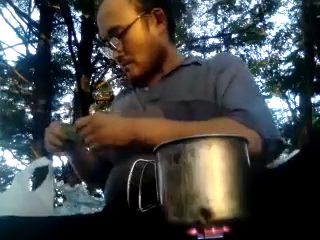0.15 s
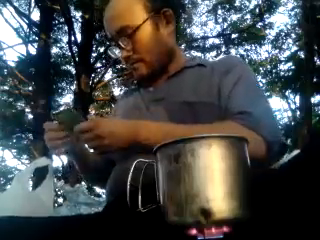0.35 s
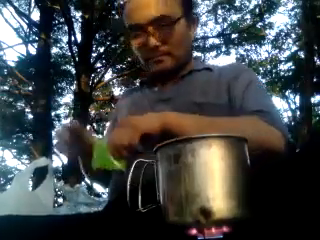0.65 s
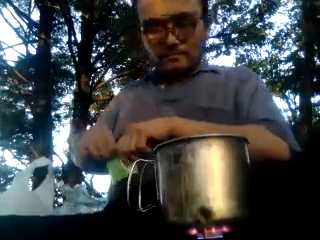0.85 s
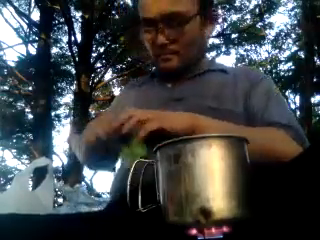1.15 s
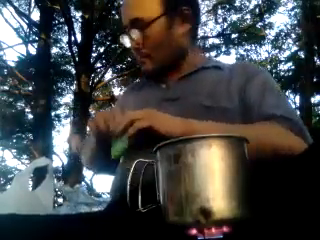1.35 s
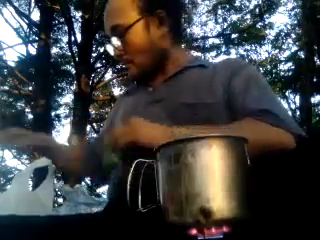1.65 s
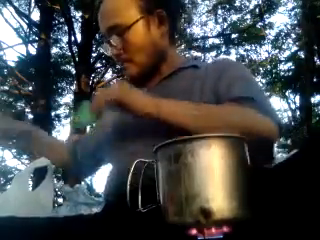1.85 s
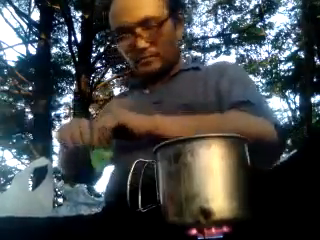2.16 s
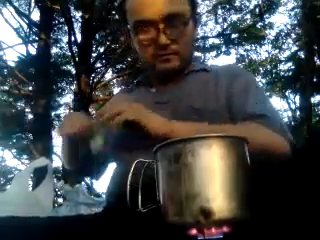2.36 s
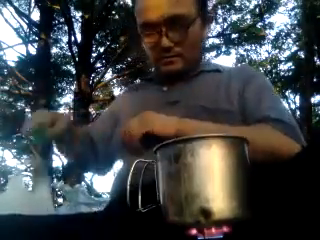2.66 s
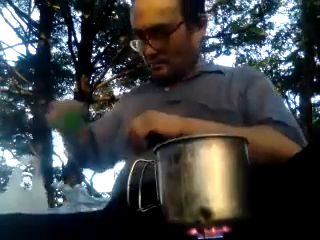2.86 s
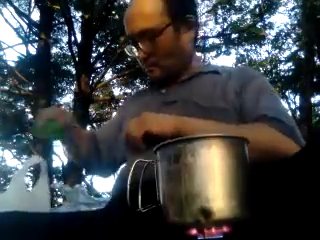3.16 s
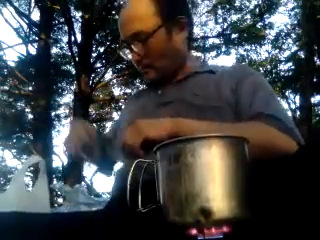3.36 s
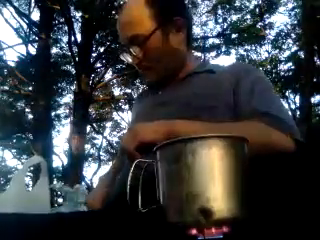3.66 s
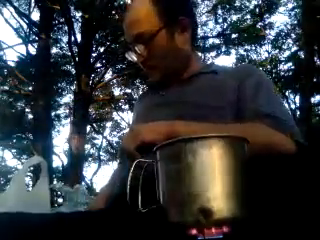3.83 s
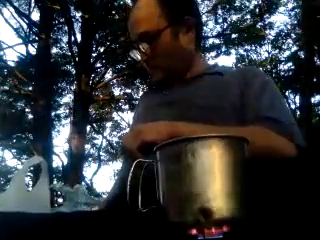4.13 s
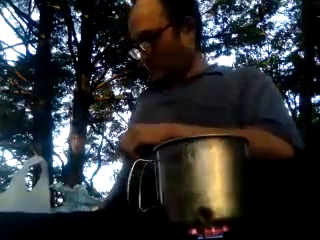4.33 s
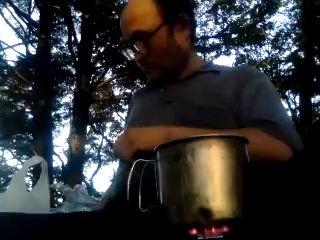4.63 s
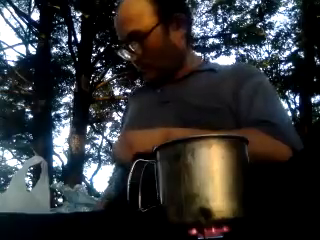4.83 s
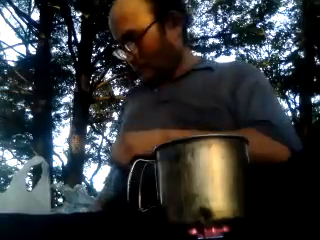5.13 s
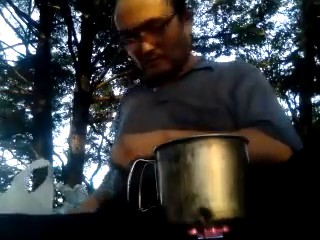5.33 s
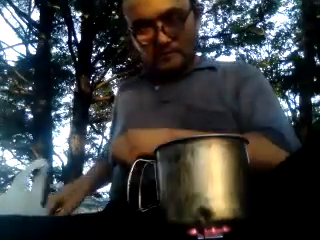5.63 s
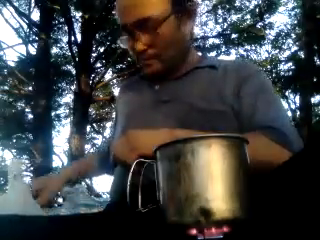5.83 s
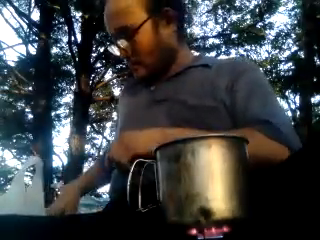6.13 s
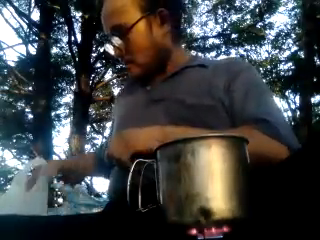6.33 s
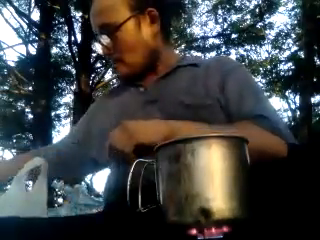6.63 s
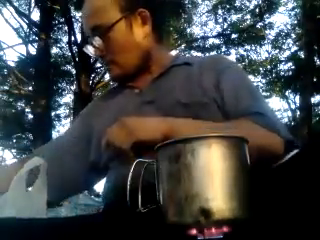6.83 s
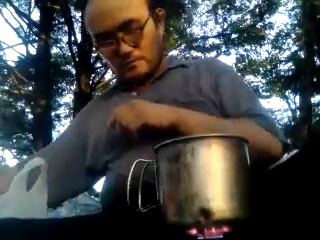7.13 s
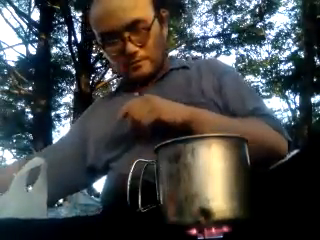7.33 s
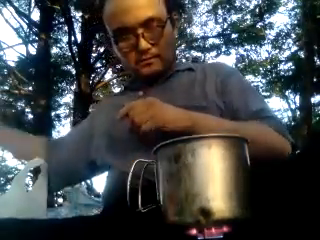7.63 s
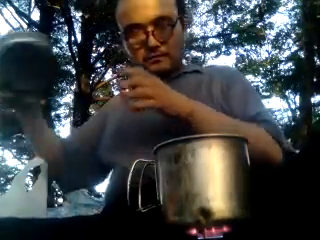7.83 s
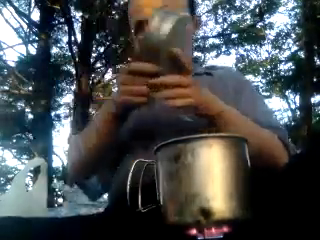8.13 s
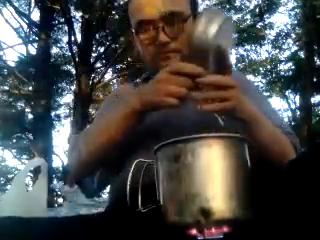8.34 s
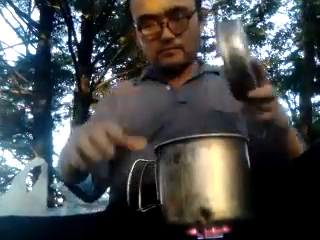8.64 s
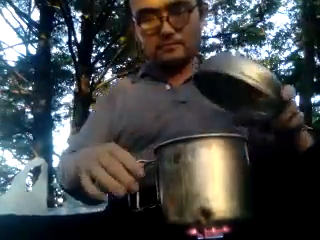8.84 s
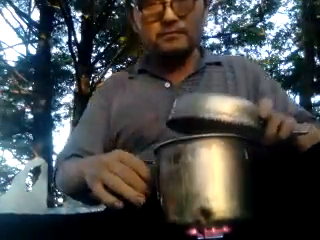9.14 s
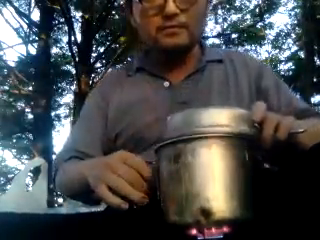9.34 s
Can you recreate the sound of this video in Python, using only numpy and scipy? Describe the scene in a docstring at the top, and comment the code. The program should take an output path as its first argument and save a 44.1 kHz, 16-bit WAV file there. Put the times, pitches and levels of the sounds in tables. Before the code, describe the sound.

Close, steady burner hiss with a fluttering low roar; crisp foil crinkling for under four seconds, later light metallic knocks and scrapes of a lid.

```python
"""A gas camping stove roars and hisses under a metal pot, outdoors: two noises, a fluttering low flame
and a steadier gas jet. A foil packet is fingered, torn and shaken: short noise bursts for the loud creases,
clustered ticks between. Then a thin metal lid is picked up, turned over and set on the pot: decaying modes,
cracks and finger rubs. A close two-port microphone hears it all: the right port faces the scene, the left one
is duller on top and takes the burner's lows in nearly opposite phase."""
import sys
import numpy as np
from scipy import signal
from scipy.fft import rfft, irfft, next_fast_len
from scipy.io import wavfile
from scipy.ndimage import uniform_filter1d, map_coordinates

SR = 44100
rng = np.random.default_rng(int(sys.argv[2]) if len(sys.argv) > 2 else 0)


def field_ratio(decibels):
    """Amplitude ratio for a level in dB (20 dB per decade); scalars and array-likes work."""
    return 10 ** (np.asarray(decibels, dtype=float) / 20)


def dump_mix(stems):
    """Bounce the given channels to the path in sys.argv[1] as a 16-bit WAV at rate SR."""
    frames = np.atleast_2d(stems).T  # one column per channel
    limited = np.clip(frames, -1, 1)  # hard clip at full scale
    pcm = np.round(limited * 32767).astype(np.int16)
    wavfile.write(sys.argv[1], SR, pcm)


N = 418068

# burner tone at the ports, notched by pot and ground: frequency_hz, right_db_per_hz, left_minus_right_db
BURNER_TONE = [(25.1, -81.5, 0), (59.3, -63.5, -1), (120, -61, -0.6), (202, -58.5, -2), (240, -55.5, -3),
               (420, -60, -4), (470, -62, -1.5), (523, -72.5, -5), (670, -64, 2), (720, -69, 1.5),
               (1013, -62.5, -1), (1127, -62, -20), (1255, -66.5, -19.5), (1320, -78, 1.5),
               (1610, -68, -5.5), (1710, -69.5, -7.5), (2076, -76, -13.5), (2346, -89, 1), (2330, -85, -6),
               (2796, -82, 0.5), (3140, -81, -1.5), (3240, -79, -5.5), (3440, -74.5, -18.5),
               (3880, -72.5, -7.5), (3780, -69, -18), (3970, -72, -21), (4150, -89, 6), (4590, -82.5, 9.6),
               (4588, -60.5, -5), (4837, -68.5, -4), (5300, -72, -14), (5070, -68, -11.5),
               (5500, -74.5, -16), (6000, -74.5, -10), (6250, -74, -8.5), (6400, -70.5, -20.5),
               (6770, -73.5, -20.5), (7050.0, -72.5, -10), (7124, -84, -7), (7490, -68.5, -11.5),
               (7690, -74, -23), (8200, -71, -34), (8030, -76, -18), (8635, -79.5, -18), (8420, -84, -35),
               (9120, -87.5, -50), (9940, -91, -45), (9600, -121.3, -25)]
# slow drift of the burner: time_s, roar_db, jet_db
BURNER_DRIFT = [(0, 1, 1), (2, 1.5, 1), (3.5, -0.5, 0.5), (4.5, 2, 0.74), (5.5, 1, 1.5), (7, 2, 1),
                (8.3, 1, 1.4), (8.8, 0.5, 1.5), (9.48, 1.5, 1)]
# how the burner in the left port follows the right: frequency_hz, likeness (0-1), left_lead_rad
PORT_LIKENESS = [(25.0, 0.86, 3.02), (60.0, 0.96, 2.9), (120.0, 0.95, 2.89), (200.0, 0.95, 2.87),
                 (260.0, 0.96, 2.88), (400.0, 0.94, 2.81), (480.0, 0.9, 3.23), (560.0, 0.99, 3.15),
                 (640.0, 0.97, 3.06), (780.0, 0.86, 2.71), (1050.0, 0.79, 1.46), (1180.0, 0.62, 1.73),
                 (1260.0, 0.05, 2.45), (1400.0, 0.29, -0.14), (1550.0, 0.7, 0.84), (1800.0, 0.48, 1.14),
                 (2050.0, 0.21, 4.11), (2300.0, 0.45, 3.26), (2450.0, 0.79, 3.22), (2650.0, 0.65, 2.89),
                 (2900.0, 0.69, 2.69), (3200.0, 0.31, 0.92), (3450.0, 0.49, 1.5), (3650.0, 0.09, 0.71),
                 (3850.0, 0.45, 3.35), (4050.0, 0.22, 4.62), (4190.0, 0.12, 5.76), (4350.0, 0.85, 3.11),
                 (4650.0, 0.79, 2.56), (4900.0, 0.58, 2.66), (5100.0, 0.55, 2.41), (5300.0, 0.55, 2.39),
                 (5550.0, 0.13, 2.12), (5850.0, 0.17, 3.4), (6100.0, 0.42, 2.01), (6450.0, 0.17, 2.47),
                 (6800.0, 0.51, 2.79), (7050.0, 0.47, 2.76), (7150.0, 0.14, 2.22), (7300.0, 0.3, 1.57),
                 (7600.0, 0.46, 2.79)]
# loudest creases of the packet: start_s, level_db (before the foil tone), decay_ms
FOIL_SNAPS = [(0.0184, -5.5, 1.3), (0.0909, -15, 2.3), (.621, -11.5, 1.4), (0.9646, -13.5, 1.5),
              (1.007, -16, 1.8), (1.0568, -15.5, 1.7), (1.1364, -13.5, 1.8), (1.196, -16.5, 2),
              (1.3627, -2, 0.68), (1.4938, -18, 1.9), (1.5972, -13, 1.6), (1.6036, -16.5, 1.7),
              (1.8007, -15, 1.2), (1.8618, -11, 2), (1.951, -15, 1.9), (1.9705, -10.5, 3.6),
              (1.9827, -16, 1.8), (1.9966, -16.5, 2.7), (2.2678, -11.5, 1.8), (2.3162, -17, 0.87),
              (2.3471, -15.5, 2.1), (2.4249, -9, 1.5), (2.5164, -19, 4.2), (2.6185, -11, 1.8),
              (2.6322, -8.5, 1.4), (2.6977, -14, 2.4), (2.7048, -14, 2.1), (2.7138, -12, 1.1),
              (2.7889, -6, 1.4), (2.7981, -7, 4), (2.806, 0.1, 1.7), (2.8636, -9.5, 4.6), (2.8689, -9, 2.1),
              (2.8917, -13.5, 2.5), (2.968, -13.5, 3), (2.9931, -8, 1.4), (3.0688, -21.5, 3.2),
              (3.196, -12, 3.1), (3.2713, -17, 1.9), (3.2817, -8.5, 3.3), (3.2887, -8, 0.47),
              (3.2933, -7, 2.9), (3.3503, -9, 5.8)]
# handfuls of crinkling, one for each squeeze or shake: start_s, length_s, level_db (before the foil tone)
FOIL_HANDFULS = [(0, 0.1, -25.5), (0.267, 0.079, -32.5), (0.584, 0.07, -28), (0.673, 0.043, -32.5),
                 (0.887, .06, -33.5), (1.043, 0.099, -28), (1.33, 0.034, -29), (1.509, 0.1, -34),
                 (1.71, 0.12, -34), (1.93, 0.12, -32), (2.28, 0.091, -23), (2.497, 0.025, -26.5),
                 (2.586, .07, -21.5), (2.69, .035, -15.5), (2.773, 0.049, -17), (2.851, 0.036, -18.5),
                 (2.955, 0.054, -19.5), (3.029, 0.078, -22), (3.169, 0.034, -25.5), (3.252, 0.059, -15.5),
                 (3.339, .08, -24), (3.5, 0.12, -30.5), (3.725, 0.034, -29.5)]
# foil tone: frequency_hz, gain_db
FOIL_TONE = [(350, -54), (600, -17.5), (1250, -6.5), (1560, -6.5), (1700, -7.5), (2850, -4), (3490, -1.5),
             (6820, -1.5), (8070, -1), (9540, -14), (10500, -44), (13600, -65.5), (22000, -120)]
# left port's filter on the packet: frequency_hz, gain_db
FOIL_SHADOW = [(500, 10), (2000, -10), (3300, -6), (4500, -17.5), (6000, -16.5), (8500, -28), (10000, -57)]
# lid contacts: start_s, relative level_db, low_modes_db, high_modes_db,
# decay_speed (1 = the t60 in LID_MODES, below 1 rings longer)
LID_CONTACTS = [(7.058, -19.5, -11, -12.5, 1.6), (7.136, -8.5, -7, -17, 3.3),
                (7.149, -15, -21, -21.5, 0.75), (7.309, -31.5, 5.5, -7, 0.82), (7.4, -16.5, -3.5, 2, 4.7),
                (7.423, -25.5, -4, -5, 1.1), (7.534, -22, -4.5, -21.5, 1.3), (7.565, -35.5, -21, 3, 0.59),
                (7.785, -35, -34.5, 4.5, 0.65), (7.85, -23.5, -22, -12.5, 0.25),
                (7.967, -8, -26, -18, 0.75), (8.105, -24, -20.5, -10, 0.83), (8.235, -21.5, -26, 0, 1.45),
                (8.383, -27.5, -28, 0.5, 2.2), (8.4, -38.5, -25, 3, 0.56), (8.462, -27, -33.5, -3, 1.4),
                (8.552, -13.5, -25, 1, 4.4), (9.088, -26, -22.5, -4, 1), (9.399, -22.5, 4, -8, 1.2),
                (9.409, -17, 4, -13, 1.3)]
# lid modes: pitch_hz, relative level_db, t60_s (at decay speed 1)
LID_MODES = [(659, 3, .1), (1271, -7.5, 0.12), (1610, -7, 0.027), (2000, -16, 0.11), (1976, -19, 0.057),
             (3160, -18.5, 0.021), (3684, -11.5, 0.13), (4160, -5, 0.076), (4750, -8.5, 0.11),
             (5310, -6, 0.054), (5730, 2, 0.038), (6200, -11, 0.06), (6360, -16.5, 0.13), (7000, -2, 0.064),
             (8020, 0, 0.055)]
# fingers sliding on the lid: start_s, length_s, level_db (before the lid filter)
LID_RUBS = [(7.1, 0.082, -36), (7.392, .05, -28.5), (7.52, 0.045, -36), (7.76, 0.11, -37.5),
            (7.96, 0.055, -39.5), (8.09, 0.042, -34), (8.17, .1, -34.5), (8.33, .15, -31.5),
            (8.6, 0.053, -37), (9.39, 0.039, -31.5)]
# left port's filter on the lid: frequency_hz, gain_db
LID_LEFT_TONE = [(600, 4), (2000, -5), (4500, -8), (8500, -21)]


def burner():
    """The flame's roar flutters below a 600 Hz split; the gas jet hisses more evenly above it."""
    roar_db, jet_db = curves(BURNER_DRIFT)
    roar_db = roar_db + 0.4 * wobble(3) + 0.7 * wobble(12) + 0.7 * wobble(40)
    jet_db = jet_db + 0.33 * wobble(2.63) + 0.062 * wobble(30)
    roar = uneven_noise(depth_db=1.8, size=3) * field_ratio(roar_db)
    jet = uneven_noise(depth_db=1.33, size=6) * field_ratio(jet_db)

    def roar_share(hz):
        return 1 / (1 + (hz / 600) ** 2)

    roar_part = filtered(roar, lambda hz: np.sqrt(roar_share(hz)))
    jet_part = filtered(jet, lambda hz: np.sqrt(1 - roar_share(hz)))
    shared, left_only = roar_part + jet_part

    def right_tone(hz):
        return field_ratio(along(BURNER_TONE, hz)[0]) * np.sqrt(SR / 2) * (hz > 15)

    def left_tone(hz):
        return right_tone(hz) * field_ratio(along(BURNER_TONE, hz)[1])

    def left_shared_tone(hz):
        likeness, lead_rad = along(PORT_LIKENESS, hz)
        return left_tone(hz) * likeness * np.exp(1j * lead_rad)

    def left_only_tone(hz):
        return left_tone(hz) * np.sqrt(1 - along(PORT_LIKENESS, hz)[0] ** 2)

    left = filtered(shared, left_shared_tone) + filtered(left_only, left_only_tone)
    return np.array([left, filtered(shared, right_tone)])


def packet():
    """Creases snap as noise bursts with a foil panel ringing inside; small creases crackle in handfuls."""
    bursts = foil_snaps() + foil_crackle()
    near, round_about = filtered(bursts, lambda hz: field_ratio(along(FOIL_TONE, hz)[0]))
    # the left port gets a copy 0.54 ms late, and a stronger unrelated part by other paths
    late = filtered(near, lambda hz: np.exp(-2j * np.pi * hz * 0.00054))
    left = filtered(0.46 * late + 1.16 * round_about, lambda hz: field_ratio(along(FOIL_SHADOW, hz)[0]))
    return np.array([left, near])


def crease(decay_s):
    """The envelope of one crease: a straight rise, then a slightly stretched exponential decay."""
    t = np.arange(1024) / SR
    rise_share = 0.85  # rise time over decay time
    rise = np.minimum(t / (rise_share * decay_s), 1)
    return rise * np.exp(-np.maximum(t / decay_s - rise_share, 0) ** 0.88)


def foil_snaps():
    """Each loud crease is noise plus the sine of a panel, pitched by chance around 5667 Hz."""
    panel_hz, panel_spread, panel_share = 5667, 0.15, 0.48  # spread is in log frequency
    out = np.zeros((2, N + SR))
    t = np.arange(1024) / SR
    chance = rng.standard_normal((len(FOIL_SNAPS), 2, len(t) + 2))
    for (start_s, level_db, decay_ms), row in zip(FOIL_SNAPS, chance):
        shape = crease(decay_ms / 1000)
        hz = panel_hz * np.exp(panel_spread * row[0, 0])
        panel = np.sin(2 * np.pi * (hz * t + row[:, 1:2]))
        burst = shape * (row[:, 2:] + panel_share * panel)
        # the same energy as the bare envelope
        burst *= np.linalg.norm(shape) / np.linalg.norm(burst, axis=1, keepdims=True)
        out[:, round(start_s * SR):][:, :len(t)] += field_ratio(level_db) * burst
    return out[:, :N]


def foil_crackle():
    """Random small creases over a finer crackle, swelling with the hand, plus faint rubbing while held."""
    ticks_per_s, tick_spread_db = 260, 3.5
    held = np.clip((3.75 - np.arange(N) / SR) / 0.01, 0, 1)  # put down at 3.75 s
    hand = swells(FOIL_HANDFULS) + field_ratio(-41) * held
    ticks = (rng.random(N) < ticks_per_s / SR) * field_ratio(tick_spread_db * rng.standard_normal(N))
    creases = unit(signal.fftconvolve(ticks, crease(0.0011))[:N])
    bed = unit(field_ratio(2.4 * wobble(500)))
    clumps = creases + field_ratio(-7) * bed
    return hand * unit(clumps) * rng.standard_normal((2, N))


def lid():
    """Contacts ring the lid and fingers rub it; the left port hears both filtered and 0.593 ms late."""
    def lid_tone(hz):
        highpass = (hz / 300) ** 2 / (1 + (hz / 300) ** 2)
        return highpass / (1 + (hz / 9300) ** 12)

    def left_tone(hz):
        return field_ratio(along(LID_LEFT_TONE, hz)[0]) * np.exp(-2j * np.pi * hz * 0.000593)

    near = filtered(field_ratio(2.0) * lid_contacts() + rubbing(), lid_tone)
    return np.array([filtered(near, left_tone), near])


def lid_contacts():
    """Each contact rings the modes with its own low-high balance and decay speed, under a dry noise crack."""
    crack_t60_s = 0.016
    out = np.zeros(N + SR)
    t = np.arange(SR // 4) / SR
    hz, mode_db, t60_s = np.transpose(LID_MODES)[:, :, None]
    modes = len(LID_MODES)
    chance = rng.standard_normal((len(LID_CONTACTS), 2 * modes + len(t)))
    for (start_s, level_db, low_db, high_db, decay_speed), row in zip(LID_CONTACTS, chance):
        strength, detune, noise = np.split(row[:, None], [modes, 2 * modes])
        balance_db = np.interp(np.log2(hz), np.log2([625, 1900, 5000]), [low_db, -6, high_db])
        size = field_ratio(level_db + mode_db + balance_db + 2 * strength - 60 * t * decay_speed / t60_s)
        tones = np.sin(2 * np.pi * hz * (1 + 0.0021 * detune) * t)
        ring = np.sum(size * tones, 0) * (1 - np.exp(-t / 0.0015))  # soft onset
        crack = 1.06 * field_ratio(level_db + high_db - 60 * t / crack_t60_s) * noise[:, 0]
        out[round(start_s * SR):][:len(t)] += ring + crack
    return out[:N]


def rubbing():
    """Skin slips on the lid at random and rings its upper modes, held short by the grip."""
    slips_per_s, t60_share = 900, 0.26  # ring time under the fingers over the t60 in LID_MODES
    slips = (rng.random(N) < slips_per_s / SR) * rng.standard_normal(N)
    t = np.arange(SR // 8) / SR
    ring = np.zeros(len(t))
    for hz, level_db, t60_s in LID_MODES[5:]:
        ring += field_ratio(level_db - 60 * t / (t60_s * t60_share)) * np.sin(2 * np.pi * hz * t)
    ring *= 1 - np.exp(-t / 0.00047)
    return signal.fftconvolve(swells(LID_RUBS) * unit(slips), ring / np.linalg.norm(ring))[:N]


def swells(rows):
    """The summed gain of (start_s, length_s, level_db) gestures with 10 ms edges."""
    now = np.arange(N) / SR
    total = np.zeros(N)
    for start_s, length_s, level_db in rows:
        inside_s = np.minimum(now - start_s, start_s + length_s - now)
        total += field_ratio(level_db) * np.clip(inside_s / 0.01, 0, 1)
    return total


def uneven_noise(depth_db, size):
    """Two unrelated noises under one random gain that varies smoothly over time and frequency."""
    cells = signal.stft(rng.standard_normal((2, N)), nperseg=512)[2]
    field = uniform_filter1d(rng.standard_normal(cells.shape[1:]), size, 0)
    field = uniform_filter1d(field, size, 1)
    return unit(signal.istft(cells * field_ratio(depth_db * unit(field)), nperseg=512)[1][:, :N])


def wobble(rate):
    """A smooth random curve through rate knots a second."""
    knots = rng.standard_normal(int(N * rate / SR) + 4)
    return map_coordinates(knots, [np.arange(N) * rate / SR])


def curves(rows):
    """One value per sample for each column after the time."""
    s, *cols = np.transpose(rows)
    return [np.interp(np.arange(N) / SR, s, c, left=c[0], right=c[-1]) for c in cols]


def along(points, hz):
    """Every column after the frequency, read on a log axis."""
    f, *cols = np.transpose(points)
    return [np.interp(np.log(hz + 1), np.log(f + 1), c) for c in cols]


def filtered(x, response):
    """Shapes x in the spectrum by a real or complex response of frequency."""
    m = next_fast_len(N + 8192)
    return irfft(rfft(x, m) * response(np.fft.rfftfreq(m, 1 / SR)), m)[..., :N]


def unit(x):
    """Scales x to an rms of one."""
    return x / np.sqrt(np.mean(x ** 2) + 1e-20)


def scene():
    """Burner, packet and lid add up in the air at the two ports."""
    return burner() + packet() + lid()


def suppressor(x, under_db, quiet_db, cut_db):
    """Each port turns down cells that dip under their usual level (above 1300 Hz) or an absolute floor."""
    hz, _, cells = signal.stft(x, SR, nperseg=1024, noverlap=768)
    power = uniform_filter1d(np.abs(cells) ** 2, size=3, axis=1)
    power = uniform_filter1d(power, size=6, axis=2)
    usual = uniform_filter1d(np.median(power, axis=2), size=13, axis=1)[..., None]
    relative_limit = usual * field_ratio(2 * under_db) * (hz[:, None] > 1300)
    limit = np.maximum(relative_limit, field_ratio(2 * quiet_db))
    is_open = 1 / (1 + (limit / (np.abs(power) + 1e-20)) ** 8)
    gain = is_open + (1 - is_open) * field_ratio(cut_db)
    return signal.istft(cells * gain, SR, nperseg=1024, noverlap=768)[1][:, :N]


def roll_off(x):
    """The treble ends steeply here."""
    return signal.sosfilt(signal.butter(12, 10850, fs=SR, output="sos"), x)


def record(dry):
    """The microphone saturates softly near 0.95, rolls off steeply at 10 kHz and thins out quiet cells."""
    soft = dry / (1 + np.abs(dry / 0.95) ** 8) ** (1 / 8)
    band_limited = filtered(soft, lambda hz: 1 / (1 + (hz / 10000) ** 40))
    finished = suppressor(band_limited, under_db=-3.0, quiet_db=-72, cut_db=-48)
    return roll_off(finished)


dry = scene()
out = record(dry)
dump_mix(out)
```